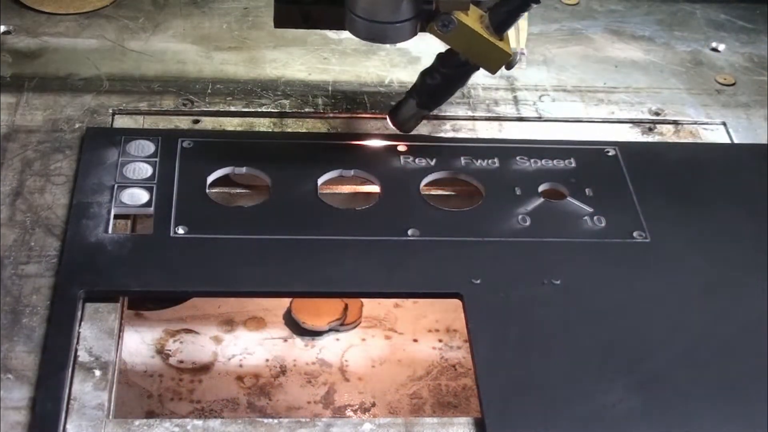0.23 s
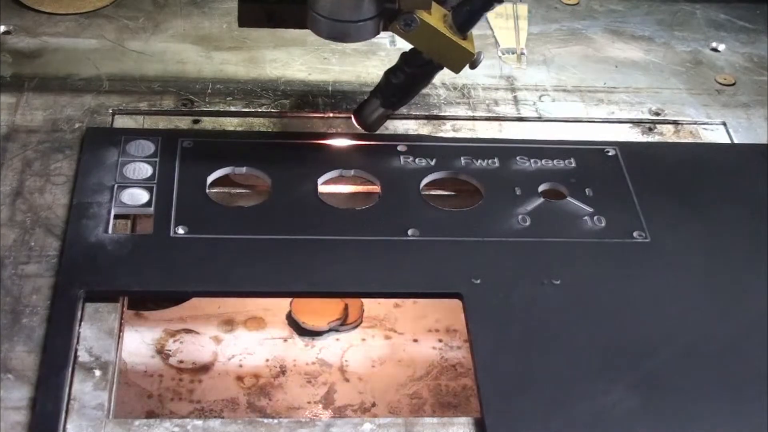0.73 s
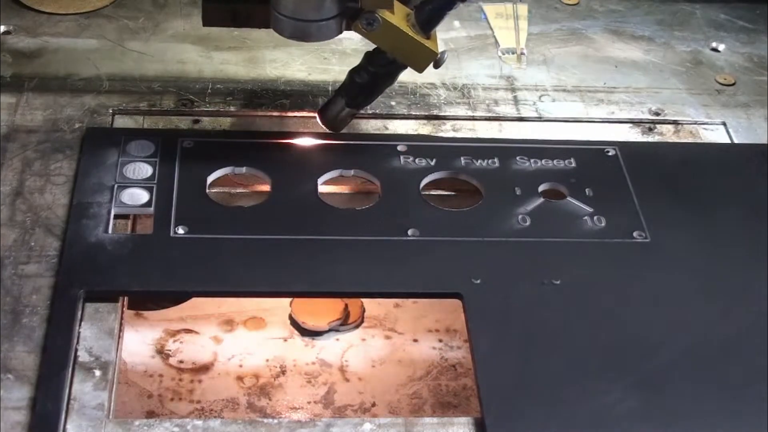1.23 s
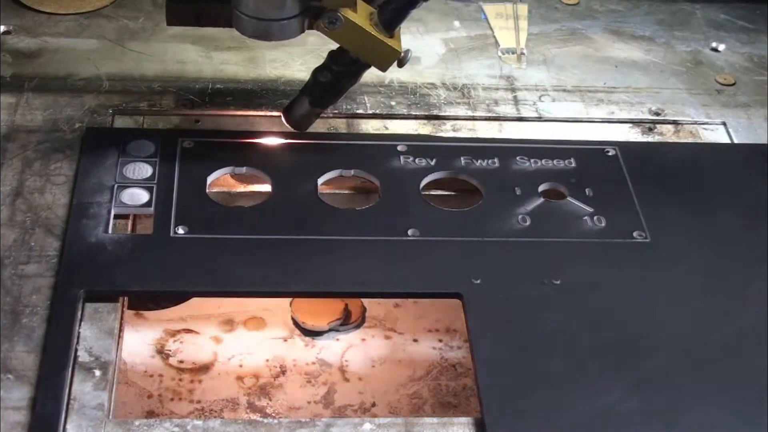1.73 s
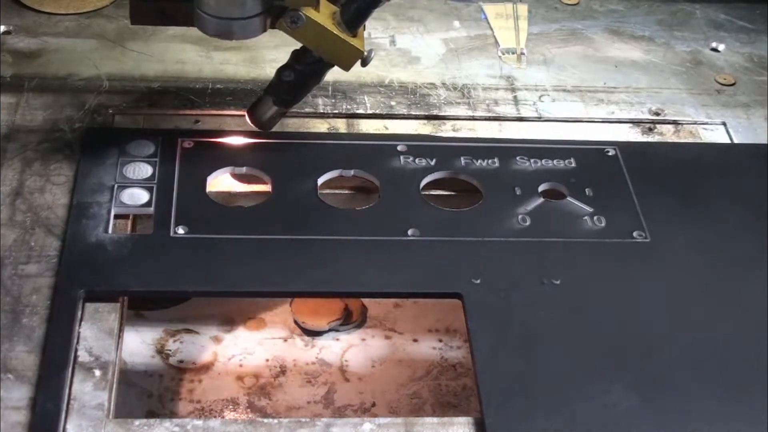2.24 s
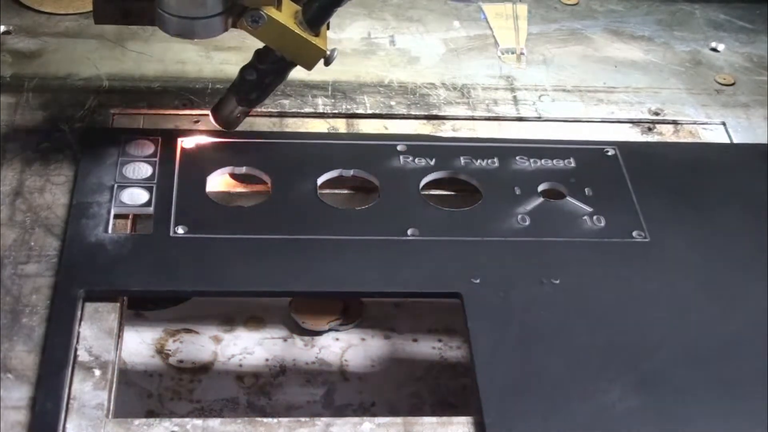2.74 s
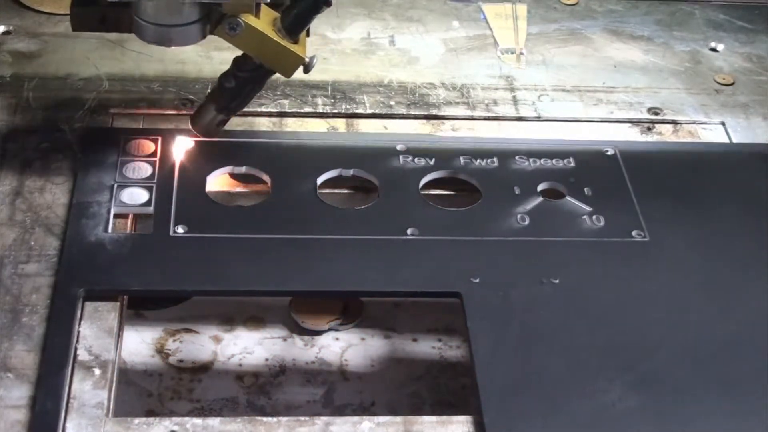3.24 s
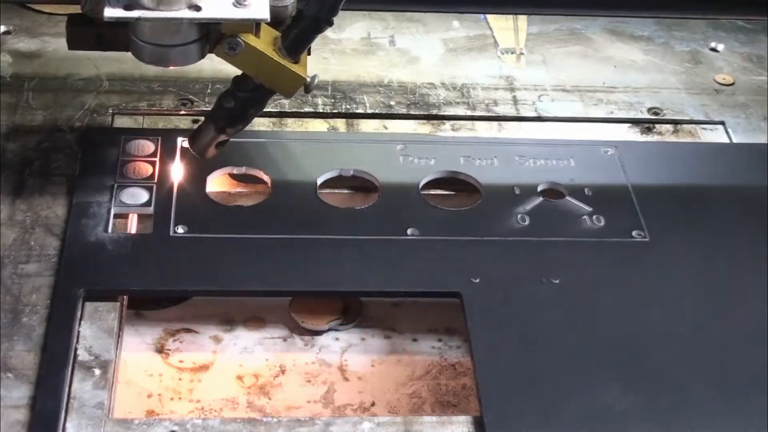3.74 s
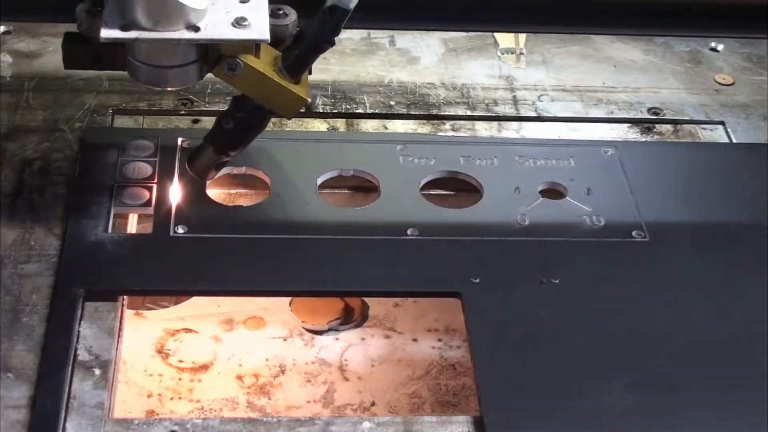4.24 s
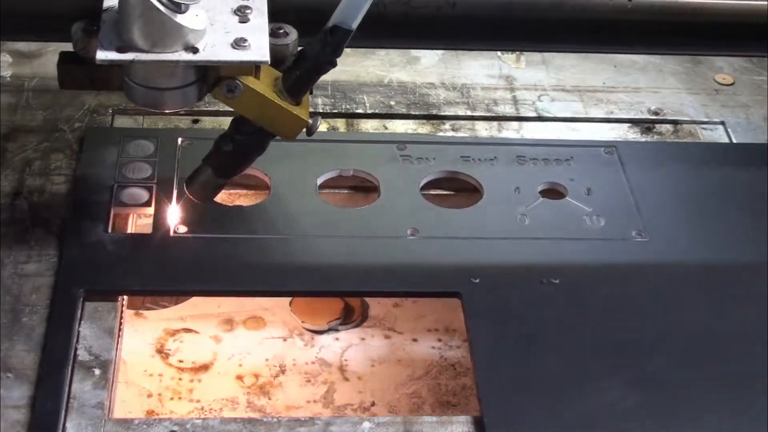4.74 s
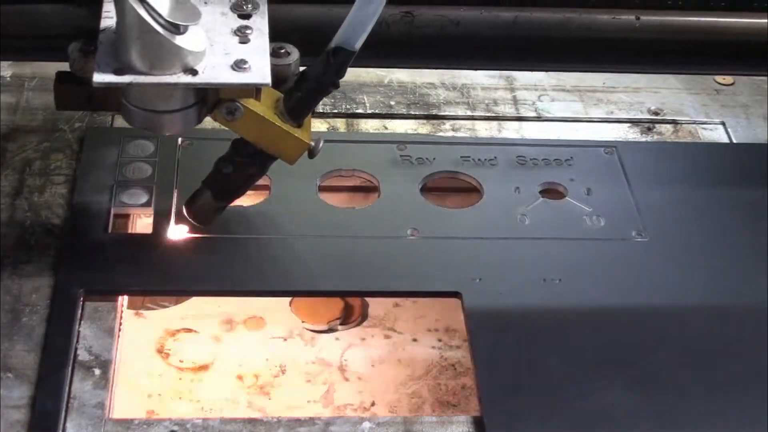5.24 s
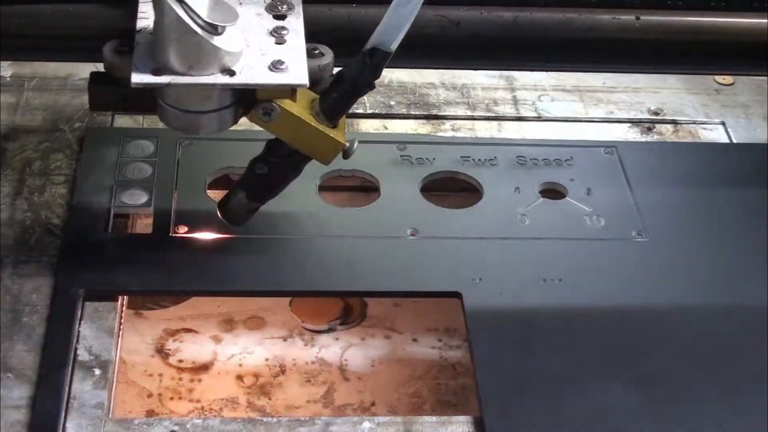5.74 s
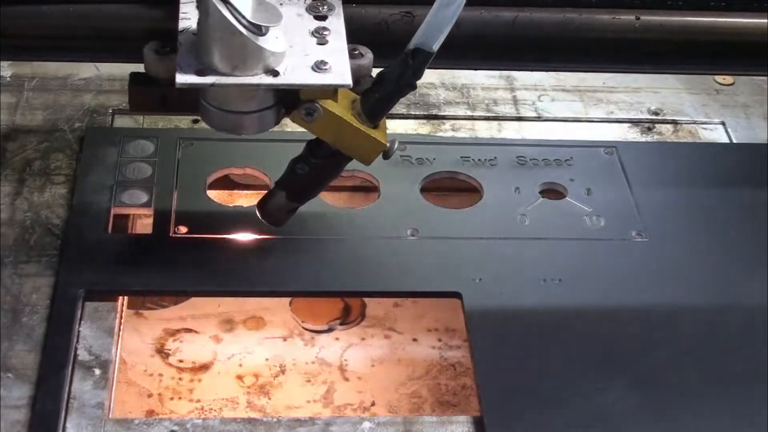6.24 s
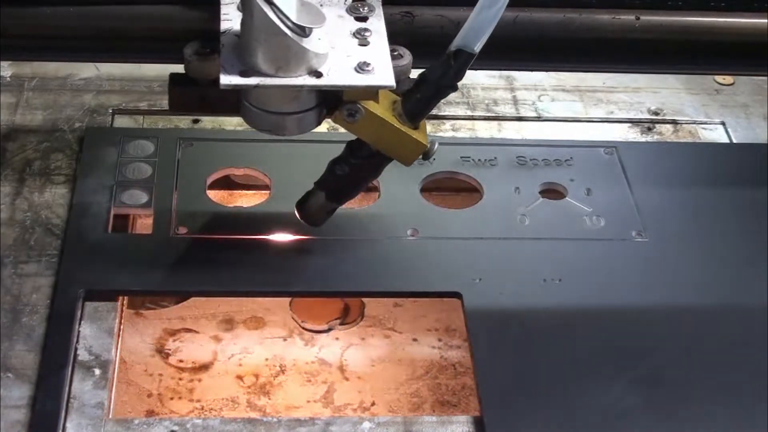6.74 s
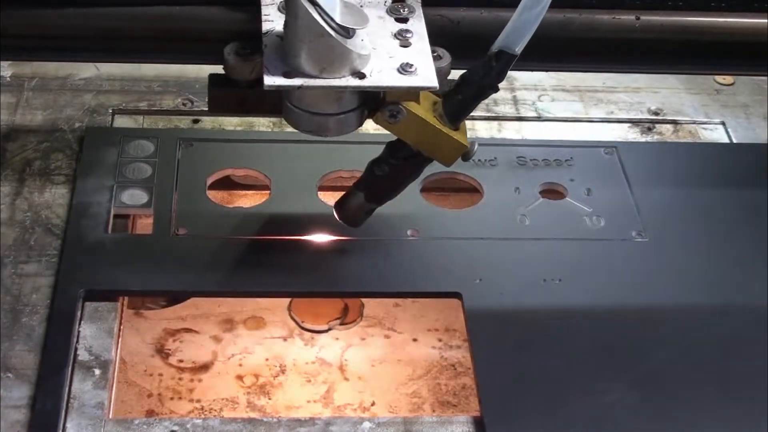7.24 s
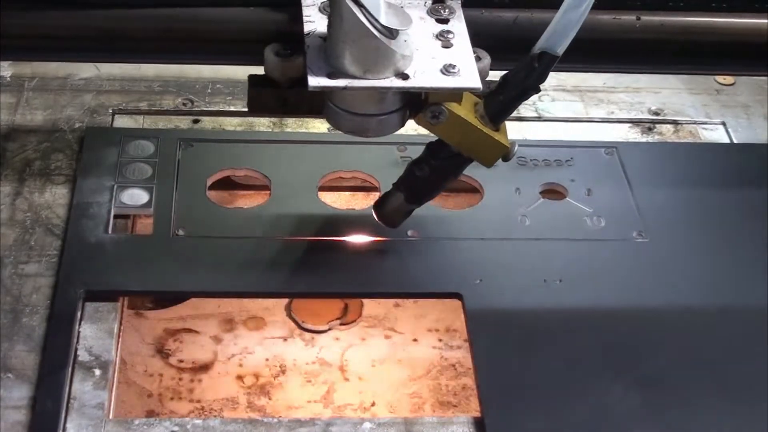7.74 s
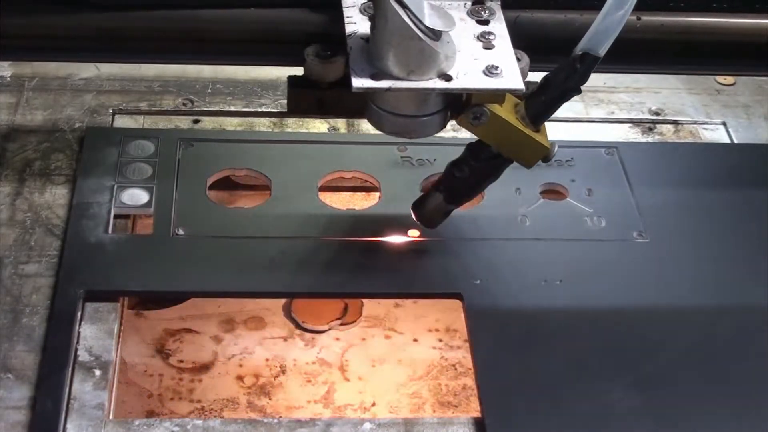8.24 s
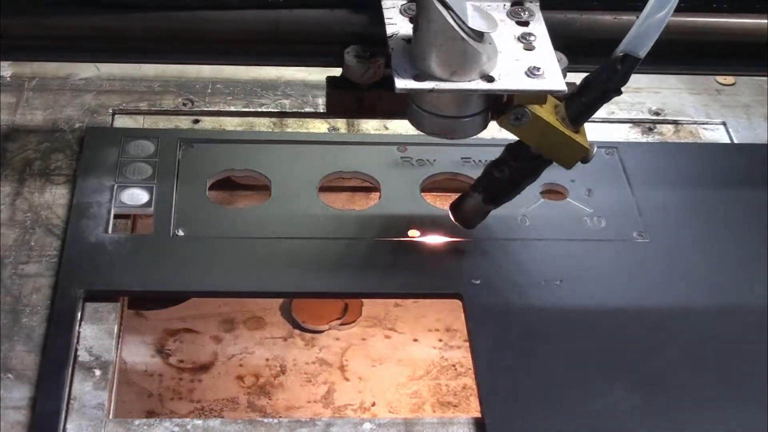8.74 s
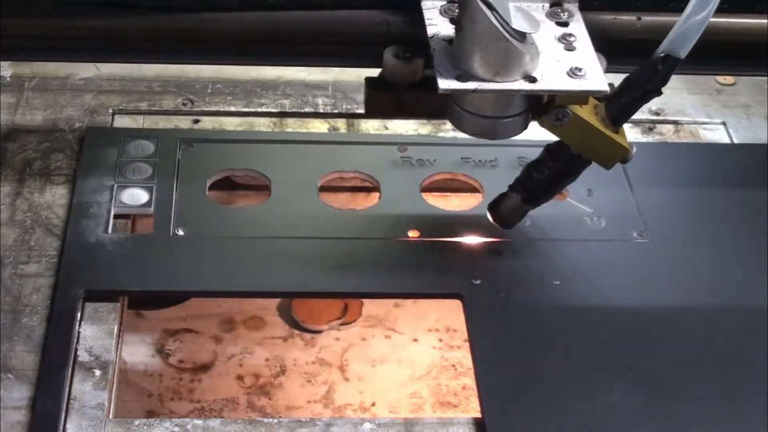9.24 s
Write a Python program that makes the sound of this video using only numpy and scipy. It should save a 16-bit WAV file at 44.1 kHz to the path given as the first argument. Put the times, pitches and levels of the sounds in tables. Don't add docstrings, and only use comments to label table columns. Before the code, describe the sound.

Continuous fizzing spatter from a laser cutter, finely chopped into a raspy flutter, sits over rushing air and extractor rumble. Clean high whines and a humming sheet tone waver beneath. Faint table knocks come and go. After about five seconds a harsh drive clatter bursts in for an instant, and the hiss resumes immediately, brightening with a thin piping whistle later. Heard close, in stereo, with slight workshop reflections.

```python
import sys
import numpy as np
from scipy import signal
from scipy.fft import rfft, irfft, next_fast_len
from scipy.io import wavfile
from scipy.ndimage import uniform_filter1d

SR = 44100
rng = np.random.default_rng(int(sys.argv[2]) if len(sys.argv) > 2 else 0)


def put_to_file(sound):
    columns = np.atleast_2d(sound).T
    safe = np.clip(columns, -1, 1)
    whole_steps = np.round(safe * 32767)
    wavfile.write(sys.argv[1], SR, whole_steps.astype(np.int16))


def gain_from_db(level_db):
    decades = np.asarray(level_db, float) / 20
    return 10 ** decades


N = 418068

CHANGE_S, RATTLE_END_S, RESUME_S = 5.3625, 5.4278, 5.4345
SHOT_HZ, SHOT_START = (300.068, 299.992), (-.04, -.04)
SIZZLE_RISE_S, SIZZLE_FALL_S = 0.099, 0.17
FRAME_S = np.arange(N // 256 + 5) * 256 / SR
TONE_S = np.arange(0, N, 64) / SR


def evened(x):
    return x / np.sqrt(np.mean(x ** 2) + 1e-20)


def read(points, hz):
    f, value = np.transpose(points)
    return np.interp(np.log(hz + 1), np.log(f + 1), value)


def turns(hz, start):
    t = np.arange(N) / SR
    return np.where(t < CHANGE_S, hz[0] * t + start[0], hz[1] * t + start[1])


def drift(depth_db, steps):
    knots = gain_from_db(depth_db * rng.standard_normal(int(N / SR * 12) + 2))
    return np.interp(np.arange(N), np.arange(len(knots)) * SR / steps, knots)


def spells(t, rows, rise_s, fall_s):
    total = 0
    for start, hold, size in rows:
        rise = np.clip((t - start) / rise_s, 0, 1)
        fall = np.clip(1 - (t - start - hold) / fall_s, 0, 1)
        total = total + size * rise * fall
    return total


def level(name, t):
    layers = {"low": (-37, 0.5, -0.1, -0.01, 0.77), "mid": (-36, 1.18, 1.15, -0.18, -0.22),
              "high": (-40.5, 0.6, 0.5, -0.05, -0.1), "top": (-39, -1, 1, 0, .01),
              "rumble": (-46, 1.56, -0.44, .01, 0.16), "jet": (-29, 1.61, -0.22, -0.04, -0.31),
              "whine": (-36, 1.82, -0.2, 0.07, -0.04), "thump": (-44.5, 1.9, -0.2, 0.61, -0.4),
              "tick": (-42.5, 1.8, -0.5, .2, -0.3), "fourth": (-57, -1.5, -2, -0.5, -0.8)}
    # start in seconds, depth in dB, hold in seconds.
    ducks = [(0.373, 1, 0.034), (1.05, 1.5, 0.51), (1.75, 1.5, 0.16), (1.972, 0.95, 0.43), (2.52, 2, 0.37),
             (2.955, 1.5, 0.68), (3.26, 2, 0.64), (4.035, 1.5, 0.093), (4.253, 1.2, 0.57),
             (4.87, 1.5, 0.35), (5.36, 3, 0.091), (5.552, 0.97, 0.62), (6.096, 0, 0.036), (6.5, 1.5, 0.041),
             (6.857, 1.5, 0.12), (7.693, 0.8, 0.037), (8.246, 2.5, 0.51), (9.19, 0.7, 0.035)]
    # start in seconds, length in seconds, strength in dB.
    slats = [
        (3.147, 0.24, 1.5),
        (5.103, .2, 3),
        (8.18, 0.48, 3.5),
        (8.75, .2, 3),
    ]
    # time in seconds, nearness in dB, kerf opening in dB.
    path = [(0., -5, 4), (.8, -1, 0), (1.6, -5.5, 2.5), (2.4, -4.5, 1.5), (3.2, -1, 0), (3.7, 0, -3.5),
            (4.3, 1.5, -2), (4.7, 3, -3), (5.2, -5, 2.5), (5.6, -2, 4.5), (6.1, 4, 2), (6.9, 8.5, 1.5),
            (7.3, 6.5, 3), (8.1, 3.5, 3), (8.5, 1, 1), (8.9, 11, -0.5), (9.48, 3, -5)]
    db, duck, sizzle, near, kerf = layers[name]
    ducked = spells(t, [(s, hold, depth) for s, depth, hold in ducks], rise_s=0.045, fall_s=0.24)
    brightened = spells(t, slats, SIZZLE_RISE_S, SIZZLE_FALL_S)
    path_s, nearness, opening = np.transpose(path)
    moved = near * np.interp(t, path_s, nearness) + kerf * np.interp(t, path_s, opening)
    return db - duck * ducked + sizzle * brightened + moved


def hiss(levels_db, colours, patchy_db, length=N):
    real, imag, patches = rng.standard_normal((length // 256 + 5, 513, 3)).T
    patches = uniform_filter1d(patches, size=14, axis=0)
    patches = evened(uniform_filter1d(patches, size=24, axis=1))
    hz = np.fft.rfftfreq(1024, 1 / SR)
    power = 0
    for colour, db in zip(colours, levels_db):
        shape = evened(gain_from_db(read(colour, hz)))
        power = power + (shape[:, None] * gain_from_db(db)) ** 2
    spectra = (real + 1j * imag) * np.sqrt(power) * gain_from_db(patchy_db * patches)
    sound = signal.istft(spectra, nperseg=1024, noverlap=768)[1]
    return np.sqrt(np.mean(power)) * evened(sound[:length])


def tones(hz, dbs, levels_db, waver_db):
    t = turns(np.divide(SHOT_HZ, SHOT_HZ[0]), (0, 0))
    total = 0
    for f, db, level_db in zip(hz, dbs, levels_db):
        angle = (2 * np.pi * ((f * t + rng.random()) % 1)).astype(np.float32)
        gain = np.repeat(gain_from_db(db + level_db), 64)[:N]
        total = total + gain * drift(waver_db, steps=4.) * np.sin(angle)
    return np.sqrt(2) * total


def pause():
    off = turns(hz=(29.966, 29.954), start=(-.02, .04)) % 1 > 1 - .2
    return gain_from_db(-11 * uniform_filter1d(off * 1., size=20))


def spatter():
    # frequency in Hz, density in dB per Hz.
    spit_low = [(300, -20), (1500, -8.5), (3000, -2), (5000, 0), (6000, -1), (6600, -6.5), (7200, -3),
                (9000, -40)]
    spit_mid = [(5000, -32), (6300, -12), (7300, -3.5), (9000, 0), (11000, -1.5), (12200, -6), (14000, -40)]
    spit_high = [(9500, -40), (11000, -12), (11800, -2.5), (12600, -4), (13050, 4), (13400, -7),
                 (13900, -2), (15500, -40)]
    spit_top = [(12500, -40), (13600, -9), (14300, -2), (14900, -2), (15400, 0), (17000, -3.5)]
    # start
    # in seconds, length in seconds, level in dB, centre in Hz, width in Hz.
    pockets = [(0., 0.97, -38, 3800, 1000), (2.1, 2.3, -46, 1070, 200), (2.55, .7, -45, 11000, 700),
               (3.7, 0.29, -40.5, 2920, 1000), (5.6, 1.25, -37.5, 5700, 1220),
               (7.05, 1.2, -39.5, 5100, 1100), (8.2, 0.83, -43, 11900, 1200), (0., 1.75, -42, 14300, 900),
               (3.2, .4, -37, 15000, 1400), (3.65, .45, -40, 15000, 1300), (3.75, .65, -43, 8800, 1600),
               (4.444, .35, -39.5, 5800, 1400), (5.113, 0.16, -42, 14700, 1400),
               (7.1, .45, -40, 9000, 1300), (8.9, .6, -41, 8200, 2000),
               (8.15, .45, -42, 15150, 260),
        (8.65, .35, -45, 15150, 260),
    ]
    shot = turns(SHOT_HZ, SHOT_START) + 1
    u = shot % 1
    size = gain_from_db(1.6 * rng.standard_normal(3000))[shot.astype(int)]
    puff = evened((1 - np.exp(-u / 0.21)) * np.exp(-u / 0.25) * size * pause())
    levels_db = [level(name, FRAME_S) for name in ("low", "mid", "high", "top")]
    colours = [spit_low, spit_mid, spit_high, spit_top]
    for s, hold, db, hz, width in pockets:
        on = spells(FRAME_S, [(s, hold, 1)], SIZZLE_RISE_S, SIZZLE_FALL_S)
        levels_db.append(db + 20 * np.log10(on + 1e-3))
        colours.append([(hz - 2 * width, -40), (hz - width / 2, -4), (hz, 0),
                        (hz + width / 2, -4), (hz + 2 * width, -40)])
    return puff * hiss(levels_db, colours, patchy_db=1.2)


def eddies():
    draw, size = rng.random((len(FRAME_S), 2)).T
    hits = (draw < 16 * 256 / SR) * size
    decay = np.exp(-np.arange(20) * 256 / SR / .012)
    return 4.5 * np.convolve(hits, decay)[:len(FRAME_S)]


def moving_air():
    # frequency in Hz, density in dB per Hz.
    rumble = [(10, -3), (25, 5), (60, -2.5), (200, -0.5), (400, 0), (550, -2.5), (900, -2), (2000, -80)]
    jet = [(150, -11), (450, -10), (800, -2), (1100, -6.5), (1450, 1.5), (2200, -4), (2800, -4.5),
           (3400, -2.5), (3850, -6.5), (4300, -4), (6000, -7), (8000, -8), (11000, -13), (16000, -11.5)]
    # start in seconds, length in seconds, swell in dB.
    draughts = [
        (0.223, .2, -1.5),
        (2.12, 0.42, 3),
        (3.486, 0.4, 7),
        (4.448, 0.35, 5.5),
        (5.6, 0.56, 0.5),
        (6.12, 0.86, 6.5),
        (7.095, 0.59, 5),
        (7.9, 0.33, 4.5),
    ]
    rumble_db = level("rumble", FRAME_S) + spells(FRAME_S, draughts, rise_s=0.093, fall_s=0.11) + eddies()
    return hiss((rumble_db, level("jet", FRAME_S)), (rumble, jet), patchy_db=1.2)


def sheet_thump():
    orders = np.array([1, 2, 4, 3, 5, 6, 7, 8, 9, 11, 18, 20, 37, 39, 40])
    order_db = [-19, -4.5, -.5, -2, -5.5, -7, -5, -1, -12, -12, -10, -11, -15, -11, -14]
    # start in seconds, length in seconds, swell in dB.
    side_leg = [
        (4.08, 1.1, 10),
        (0., 2., 3),
        (5.9, 2.2, 8),
        (8.75, .7, 5),
    ]
    low_db, high_db = level("thump", TONE_S), level("tick", TONE_S)
    levels = {2: low_db, 3: (low_db + high_db) / 2,
              4: level("fourth", TONE_S) + spells(TONE_S, side_leg, rise_s=.1, fall_s=.1)}
    levels_db = [levels.get(k, high_db) for k in orders]
    return tones(orders * SHOT_HZ[0], order_db, levels_db, waver_db=1.6) * pause() ** .3


def supply_whine():
    line_hz = [871.5, 1356.8, 1414.2, 1471.66, 1529.07, 2071.77, 2228.3, 2343.17, 3527.74, 4070.45, 4127.86,
               4728., 2129., 8255.75]
    line_db = [-11.5, -4, -15, 0, -15, -8, -16, -7.5, -5.5, -14, -5, -12, -13, -17]
    return tones(line_hz, line_db, [level("whine", TONE_S)] * len(line_hz), waver_db=.7)


def frame_bumps():
    # start in seconds, peak in dB, pitch in Hz.
    knocked = [(0.253, -28, 66), (.3, -32, 62), (2.11, -33, 66), (2.2, -37, 60), (2.286, -35, 150),
               (2.41, -36, 140), (4.592, -34, 132), (5.672, -37, 105), (5.95, -38, 68.8), (6.2, -37, 80),
               (7.397, -37, 170), (7.537, -36, 145), (7.8, -35, 70)]
    out, age = np.zeros(N), np.arange(8192) / SR
    for s, db, hz in knocked:
        swell = (1 - np.exp(-age / 0.0076)) * np.exp(-age / 0.022)
        ring = gain_from_db(db - 4.5) * swell * np.sin(2 * np.pi * hz * age)
        out[round(s * SR):][:len(age)] += ring
    return out


def rattle():
    # time in seconds, hiss in dB, boom in dB.
    knocks = [
        (5.364, -25, -9),
        (5.3738, -13.5, -16),
        (5.3785, -17, -10),
        (5.385, -28, -13),
        (5.3912, -14.5, -11),
        (5.4085, -10.5, -13),
        (5.416, -24, -14),
        (5.42, -30, -11),
        (5.4245, -15.5, -24),
    ]
    # frequency in Hz, density in dB per Hz.
    colour = [(60, -40), (110, -11), (200, -11), (450, -9), (560, -11.5), (1000, -11), (2200, -10.5),
              (3300, -12), (7000, -11.5), (10300, -14), (12500, -22), (15800, -28)]
    # pitch in Hz, width in Hz, level in dB.
    casing = [(147, 40, 5), (250, 60, 6.5), (445, 90, 5), (706, 40, 10), (835, 40, 6), (4860, 250, -1),
              (7290, 300, 2), (9490, 250, -1), (10200, 120, 1)]
    first = int(CHANGE_S * SR)
    t = np.arange(first, first + 4096) / SR
    burst, boom = np.zeros(len(t)), np.zeros(len(t), complex)
    for s, hiss_db, boom_db in knocks:
        age = np.clip(t - s, 0, 1)
        burst += gain_from_db(hiss_db) * (1 - np.exp(-age / .0006)) * np.exp(-age / .0035)
        boom += gain_from_db(boom_db) * (1 - np.exp(-age / .0015)) * np.exp(-age / .007)
    boom *= np.exp(2j * np.pi * 294 * (t - 5.3632))
    noise = (burst + gain_from_db(-27)) * 1.45 * hiss((0,), (colour,), patchy_db=.1, length=len(t))
    rings = 0
    for hz, width, db in casing:
        rings = rings + gain_from_db(db) * signal.lfilter(*signal.iirpeak(hz, hz / width, SR), noise)
    window = np.clip((t - CHANGE_S) / .003, 0, 1) * np.clip((RATTLE_END_S - t) / .0015, 0, 1)
    lead = .4 * boom.real
    piece = window * (noise + rings + 1.1 * (boom.imag + np.array([lead, -lead])))
    piece = signal.sosfilt(signal.butter(3, 110, "high", fs=SR, output="sos"), piece)
    return np.pad(piece, ((0, 0), (first, N - first - len(t))))


def scene():
    t = np.arange(N) / SR
    fade = np.clip((CHANGE_S - t) / 0.0019, 0, 1) + np.clip((t - RESUME_S) / 0.0011, 0, 1)
    fade += (t > RATTLE_END_S - .002) * np.clip((RESUME_S - t) / 0.00077, 0, 1)
    laser = spatter() + moving_air() + sheet_thump() + supply_whine() + frame_bumps()
    return fade * laser + rattle()


def room_scatter(mid):
    echoes = rng.standard_normal((3, 800)) * np.exp(-np.arange(800) / 340.0)
    t = np.arange(N) / SR
    roomy = mid * (abs(t - (CHANGE_S + RATTLE_END_S) / 2) > .035)
    total = 0
    for echo in echoes:
        sway = drift(3.15, steps=7.) - drift(4.4, steps=7.)
        total = total + sway * signal.oaconvolve(roomy, echo / np.linalg.norm(echo))[:N]
    return total


def top_cut(x):
    return signal.sosfilt(signal.butter(12, 17090, fs=SR, output="sos"), x)


def record(dry):
    # frequency in Hz, share in step or a quarter turn ahead.
    in_step = [(60, 0.17), (550, 0.11), (1650, 0.14), (2900, 0.041)]
    ahead = [(60, -0.13), (400, -0.17), (700, 0.28), (1100, 0.35), (1450, 0.35), (2400, 0.39), (2900, 0.26)]
    # frequency in Hz, level in dB of the echoes that differ between the ports.
    scatter_db = [(40, -8.5), (300, -6.5), (600, -9), (1500, -19), (3000, -21)]
    mid, size = .9 * np.tanh(dry.mean(0) / .9), next_fast_len(N)
    hz = np.fft.rfftfreq(size, 1 / SR)
    spectrum = rfft(mid, size)
    side = spectrum * (read(in_step, hz) + 1j * read(ahead, hz))
    side = side + gain_from_db(read(scatter_db, hz)) * rfft(room_scatter(mid), size)
    side = side + rfft(dry[0] - dry[1], size) / 2
    side = irfft(side * (hz < 3080), size)[:N]
    mid = irfft(spectrum * (hz < 15730), size)[:N]
    return top_cut(np.array([mid + side, mid - side]))


dry = scene()
out = record(dry)
put_to_file(out)
```